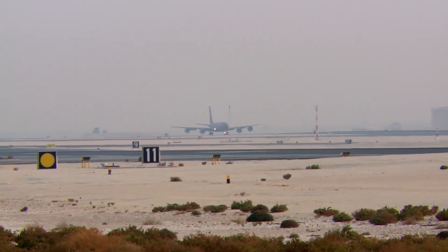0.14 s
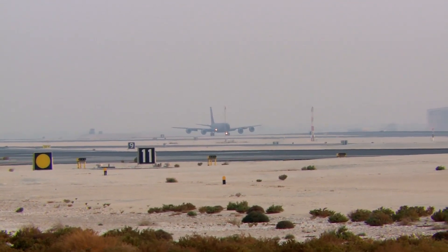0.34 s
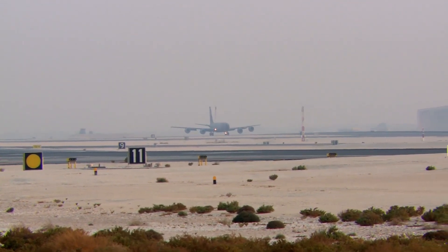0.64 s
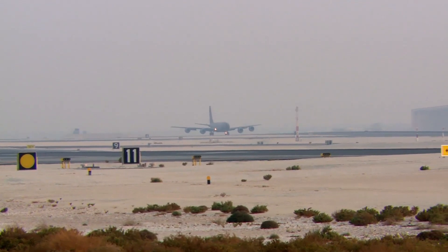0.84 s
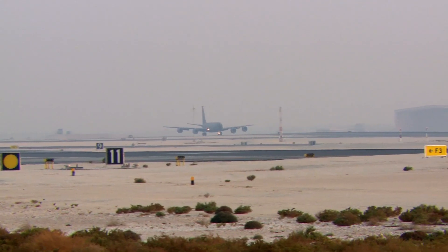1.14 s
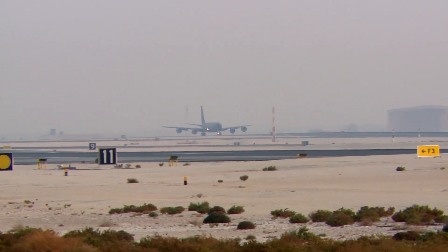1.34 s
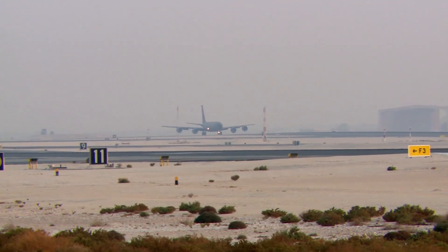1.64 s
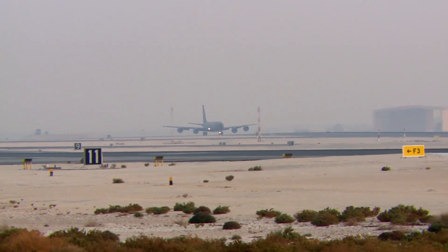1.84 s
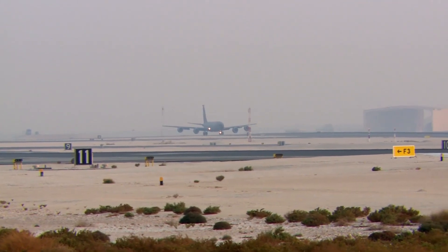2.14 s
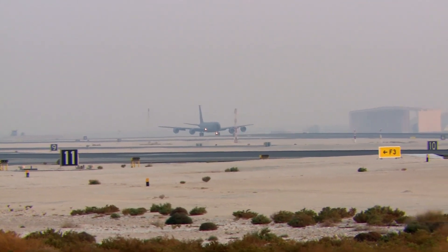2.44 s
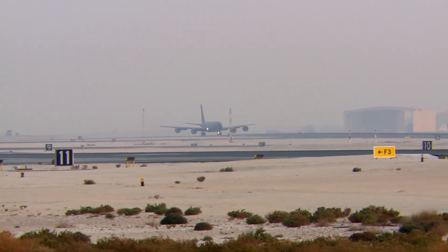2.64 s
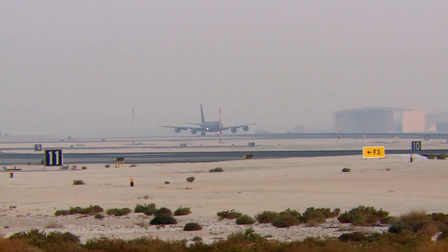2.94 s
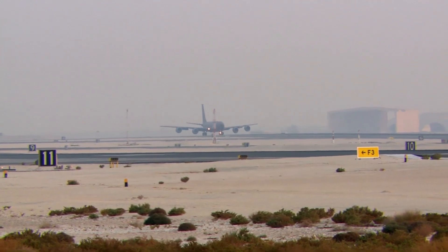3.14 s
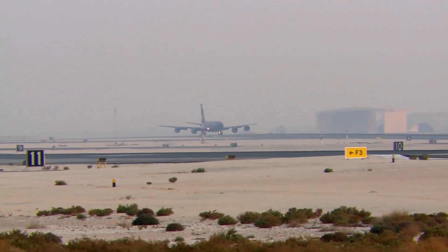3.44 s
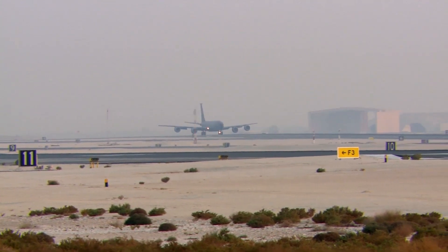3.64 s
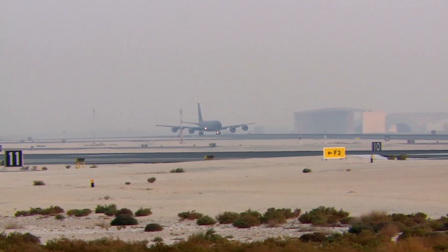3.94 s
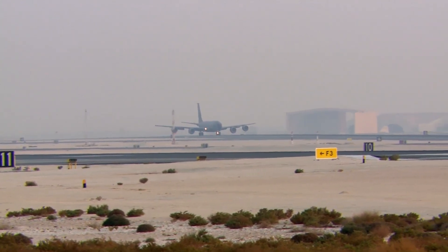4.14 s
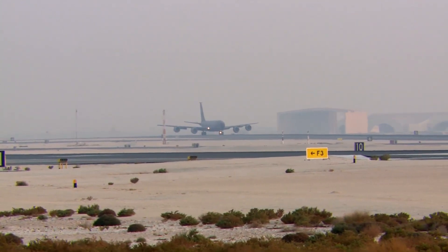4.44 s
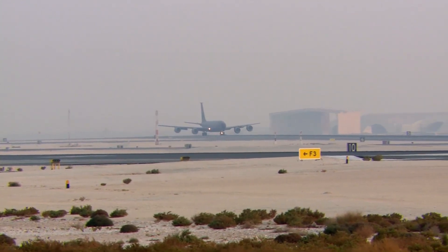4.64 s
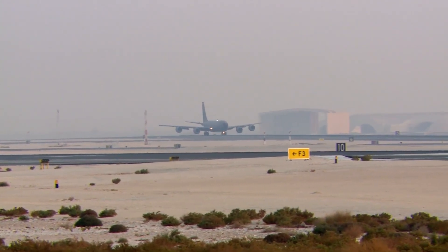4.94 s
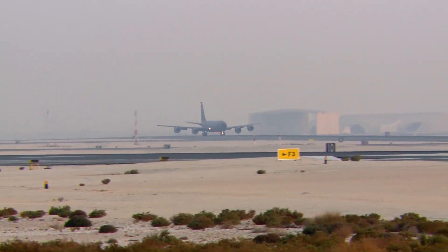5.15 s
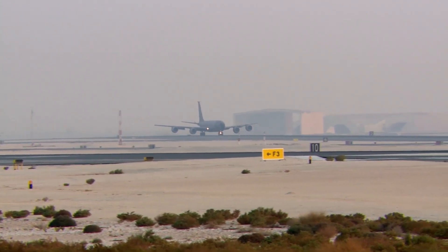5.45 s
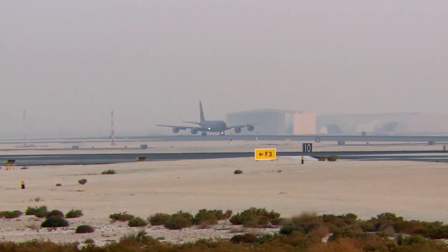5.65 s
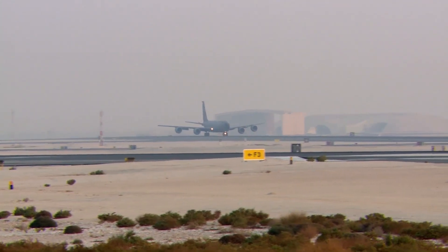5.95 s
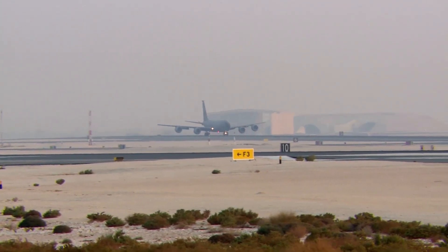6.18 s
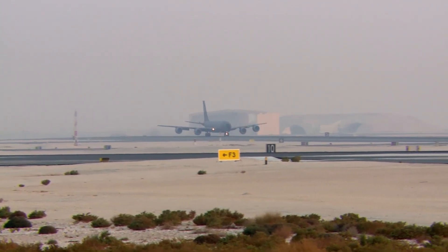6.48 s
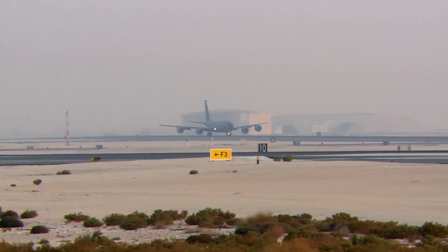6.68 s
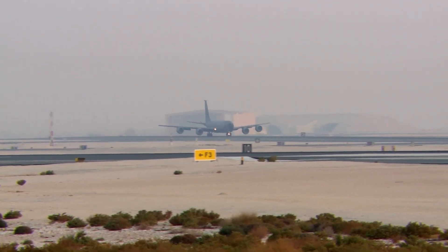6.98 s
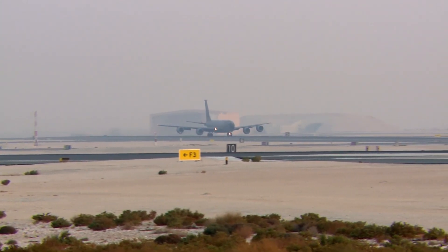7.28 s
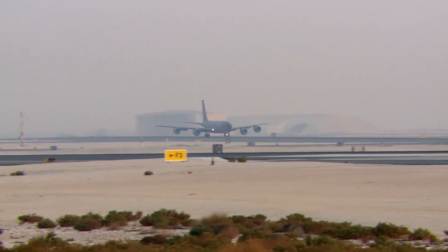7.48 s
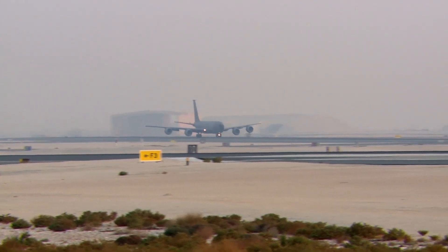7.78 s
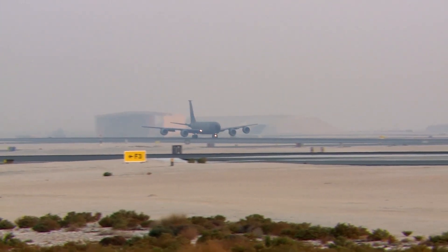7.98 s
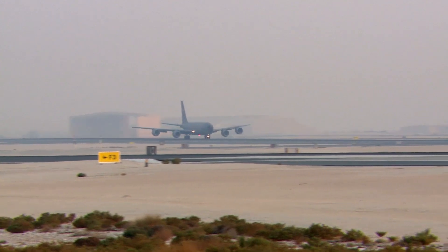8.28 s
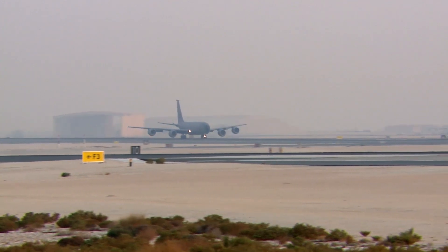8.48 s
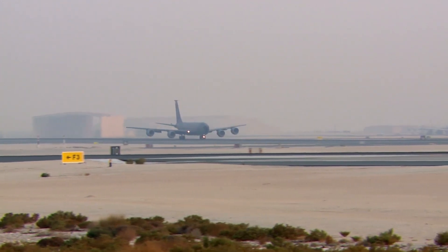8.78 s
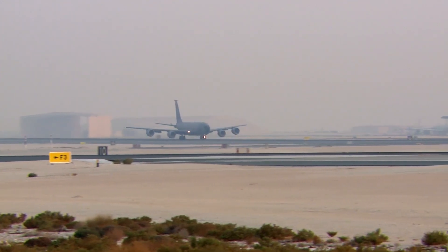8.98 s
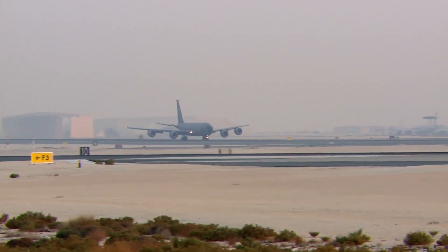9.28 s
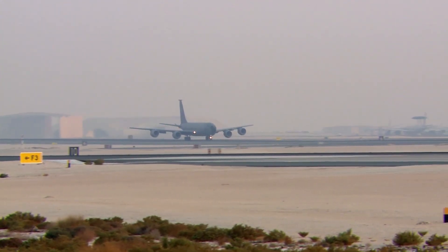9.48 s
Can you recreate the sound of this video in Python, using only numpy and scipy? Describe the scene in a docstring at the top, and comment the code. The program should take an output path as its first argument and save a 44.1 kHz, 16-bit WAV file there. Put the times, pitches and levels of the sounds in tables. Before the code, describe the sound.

From the start, a four-engined jet far across an open airfield makes a deep rumble and a dull roar, with a faint intake rush and an even microphone hiss underneath. The sound grows gradually as the aircraft rolls nearer. The handled camera gives tiny ticks at about 0.3 seconds, a sharper plastic click at 3.6 seconds, and two faint ticks around 7.5 seconds. From about 6 seconds the rush becomes stronger and brighter, and a thin fan whine comes through with a faint buzz, fluttering and slowly rising in pitch. The whine flares briefly near 6.3 and 7.3 seconds. Around 9 seconds the rush and whine are at their strongest, and the low exhaust roar swells just behind them, peaking at about 9.5 seconds.

```python
"""A four-engined jet rolls toward a camera from far across a hot, flat airfield.
From the start its exhaust rumbles and roars dully, over a faint intake rush and microphone hiss.
The handled camera clicks a few times, loudest at 3.6 s. The rush grows, and a thin whine from the
fan blades comes through, slowly rising in pitch and fluttering in the hot air. Near 9 s the sound
beamed from the intakes sweeps over the camera, followed by the swelling roar of the exhaust."""
import sys
import numpy as np
from scipy import signal
from scipy.fft import rfft, irfft, next_fast_len
from scipy.io import wavfile
from scipy.ndimage import uniform_filter1d, map_coordinates

SR = 44100
rng = np.random.default_rng(int(sys.argv[2]) if len(sys.argv) > 2 else 0)


def generate_wav(sig):
    """Save sig (samples, or channels by samples) to the path in sys.argv[1] as 16-bit PCM at SR."""
    pcm = np.round(np.clip(np.atleast_2d(sig).T, -1, 1) * 32767).astype(np.int16)
    wavfile.write(sys.argv[1], SR, pcm)


N = 424241


def amp(db):
    """Turn decibels into a gain to multiply by."""
    return 10 ** (np.asarray(db) / 20)


def unit(x):
    """Scale a signal to an average strength (rms) of 1."""
    return x / np.sqrt(np.mean(np.abs(x) ** 2) + 1e-20)


def approach(start_db, db_per_s):
    """Level in dB of a source that rolls steadily nearer."""
    return start_db + db_per_s * np.arange(N) / SR


def swell(peak_s, width_s, db):
    """A bell-shaped rise and fall in dB around peak_s."""
    return db * np.exp(-.5 * ((np.arange(N) / SR - peak_s) / width_s) ** 2)


def wobble(rate_hz):
    """A smooth curve through rate_hz random points a second."""
    coarse = np.arange(0, N + 64, 64)
    points = rng.standard_normal(int(N * rate_hz / SR) + 4)
    curve = map_coordinates(points, [coarse * rate_hz / SR], mode="nearest")
    return unit(np.interp(np.arange(N), coarse, curve))


def filtered(x, gain_at):
    """Multiply each frequency in x by gain_at(hz)."""
    size = next_fast_len(N + SR // 2)
    return irfft(rfft(x, size) * gain_at(np.fft.rfftfreq(size, 1 / SR)), size)[:N]


def noise(spectrum, patchy_db):
    """Noise shaped by a pitch and level table, with random louder and softer patches."""
    grid = signal.stft(rng.standard_normal(N), nperseg=1024)[2]  # pitch by time
    patches = uniform_filter1d(rng.standard_normal(grid.shape), size=14, axis=0)
    patches = uniform_filter1d(patches, size=14, axis=1)
    patchy = signal.istft(grid * amp(patchy_db * unit(patches)), nperseg=1024)[1][:N]
    pitch_hz, level_db = np.transpose(spectrum)
    return unit(filtered(patchy, lambda hz: amp(np.interp(np.log(hz + 1), np.log(pitch_hz), level_db))))


# How strong the rumble is from low to high. Columns: pitch_hz, level_db
RUMBLE_SPECTRUM = [(10, -20), (25, -11), (40, -8.5), (55, 0.5), (72, 0.5), (100, -1.5), (150, -7),
                   (205, -9), (250, -20), (400, -63), (1200, -120)]


def exhaust_rumble():
    """The jets of exhaust make a deep rumble that grows as the aircraft nears."""
    return amp(approach(-34.5, db_per_s=0.52)) * noise(RUMBLE_SPECTRUM, patchy_db=.5)


# The exhaust's roar from far away and from nearer by. Columns: pitch_hz, level_db
FAR_ROAR_SPECTRUM = [(20, -59), (100, -22.5), (220, -1), (300, 1), (450, -9.5), (620, -10), (700, -10),
                     (870, -10), (1050, -18), (1500, -24), (2000, -33.5), (2600, -51), (4500, -48),
                     (12000, -120)]
NEAR_ROAR_SPECTRUM = [(10, -65), (60, -13.5), (140, 2), (280, 1.5), (380, -1.5), (480, -4.5), (600, -11),
                      (720, -18), (1000, -39), (1500, -45), (8000, -120)]


def exhaust_roar(far_db=-46.5, near_boost_db=2.0, emerge_db=-41):
    """The near roar rises out of the dull, far one as the jets' beam of sound sweeps over the camera."""
    far = amp(far_db) * noise(FAR_ROAR_SPECTRUM, patchy_db=1)
    roar_db = approach(-47.5, db_per_s=0.26) + swell(peak_s=9.45, width_s=1.316, db=11)
    shadow_db = 0.64 * np.minimum(roar_db - emerge_db, 0)  # quieter still while below emerge_db
    near = amp(roar_db + shadow_db + near_boost_db) * noise(NEAR_ROAR_SPECTRUM, patchy_db=0)
    return far + near


# The intakes' broad rush and their brighter howl. Columns: pitch_hz, level_db
RUSH_SPECTRUM = [(50, -120), (600, -19), (1100, -2), (1450, -2.5), (1850, 2.5), (2200, -1.5), (2600, -5),
                 (3200, -10), (3800, -17), (4500, -31), (6000, -50.5), (12000, -120)]
HOWL_SPECTRUM = [(200, -120), (1200, -28), (1700, -14), (2200, 6), (2700, -1), (3200, -6), (3700, -11.5),
                 (4300, -15), (4600, -27), (6000, -40), (10000, -120)]
# Moments when hot air focuses the fans' sound. Columns: peak_s, width_s, whine_gain_db, howl_gain_db
HOT_AIR_FLARES = [(6.28, 0.14, 5, 4), (7.28, 0.032, 9, -3), (8.12, 0.1, 2, 3.5), (8.6, 0.067, 0, 5.5),
                  (8.97, 0.22, 8.5, 2.5)]


def intake_rush(rush_db, near_db=-55, brightening=0.66):
    """Broad fan noise; the air swallows less of its treble as the aircraft gets nearer."""
    rush = noise(RUSH_SPECTRUM, patchy_db=1.2)
    howl = noise(HOWL_SPECTRUM, patchy_db=2.4)
    flare_db = sum(swell(peak_s, width_s, db) for peak_s, width_s, _, db in HOT_AIR_FLARES)
    howl_db = -6 + brightening * (rush_db - near_db) + flare_db
    return amp(rush_db) * (amp(-0.3) * rush + amp(howl_db) * howl)


# The nearly flat spread of the hiss. Columns: pitch_hz, level_db
HISS_SPECTRUM = [(100, 3.5), (3000, -4), (5000, -4), (7000, -5), (15000, -6.5)]


def microphone_hiss(level_db=-70):
    """The microphone adds a faint, even hiss of its own."""
    return amp(level_db) * noise(HISS_SPECTRUM, patchy_db=0)


# Clicks of the handled camera; a fade is the time to drop by 60 dB.
# Columns: start_s, snap_db, ring_db, snap_fade_s, snap_pitch_hz
CAMERA_CLICKS = [(.2868, -61, -70, .025, 7700), (0.288, -65, -72, .03, 4100),
                 (.3805, -63, -78, 0.027, 4300), (3.5899, -44, -47, 0.019, 3720),
                 (3.5959, -39, -40, 0.014, 895), (3.5995, -38.5, -42, 0.023, 1400),
                 (3.6312, -49, -48, 0.011, 9800), (7.467, -57, -85, 0.013, 10850),
                 (7.57, -54, -69, .02, 4970)]
# The notes at which the camera's plastic body rings. Columns: pitch_hz, level_db, fade_s
BODY_NOTES = [(627, 6, 0.026), (1010, 1, .05), (1154, 7, 0.033), (1320, 5, 0.04), (1510, -3, 0.044),
              (2680, -1, 0.022), (3400, -11, .022), (4100, -10, .02), (4970, -12, 0.017),
              (8700, -14, 0.016), (10400, -13, .015)]


def camera_clicks(snap_width_octaves=0.13, attack_s=0.0006, dull_hz=12000):
    """Each click is a short snap of noise that rings the camera's body."""
    out = np.zeros(N + SR)
    t = np.arange(SR // 8) / SR
    hz = np.fft.rfftfreq(len(t), 1 / SR) + 1
    treble_cut = 1 / np.hypot(1, (hz / dull_hz) ** 10)
    onset = 1 - np.exp(-t / attack_s)
    for start_s, snap_db, ring_db, snap_fade_s, snap_pitch_hz in CAMERA_CLICKS:
        band = treble_cut / np.hypot(1, np.log2(hz / snap_pitch_hz) / snap_width_octaves)
        burst = irfft(rfft(rng.standard_normal(len(t))) * band, len(t))
        snap = unit(burst) * amp(-60 * t / snap_fade_s)
        ring = sum(amp(level_db + rng.normal(0, 2.4) - 60 * t / fade_s) * np.sin(2 * np.pi * pitch_hz * t)
                   for pitch_hz, level_db, fade_s in BODY_NOTES)
        out[round(start_s * SR):][:len(t)] += (amp(snap_db) * snap + amp(ring_db) * ring) * onset
    return out[:N]


def shaft_angle(start_hz=89.35, gain_hz_per_s=.645):
    """How far the fan shafts have turned, in radians, as they steadily speed up."""
    turns_per_s = start_hz + gain_hz_per_s * np.arange(N) / SR
    return 2 * np.pi * np.cumsum(turns_per_s) / SR


def fluttering_tone(phase, flutter_hz, direct):
    """A tone flutters because it arrives both directly and by paths scattered in the hot air."""
    paths = unit(direct + wobble(flutter_hz) + 1j * wobble(flutter_hz))
    return paths.real * np.cos(phase) + paths.imag * np.sin(phase)


# The tones in the fans' buzz. Columns: cycles_per_turn, level_db
BUZZ_TONES = [(3, 5), (10, -10), (13, -17), (14, -14), (16, -10), (19, -11), (20, -14), (21, -14),
              (22, -10), (23, -11), (24, -14), (30, -20), (34, -21), (39, -28), (40, -22)]


def blade_buzz(angle, rush_db, offset_db=-1.5):
    """Uneven blades buzz faintly at multiples of the shaft speed, growing with the intake rush."""
    buzz = sum(amp(level_db) * fluttering_tone(cycles_per_turn * angle, flutter_hz=14, direct=1.4)
               for cycles_per_turn, level_db in BUZZ_TONES)
    return amp(rush_db + offset_db) * buzz


# The four fans, one to an engine. Columns: speed_ratio (to the shared shaft speed), level_db
ENGINE_FANS = [(.9962, -9), (.9979, -8), (.9989, 0), (1.0013, -8)]


def blade_whine(angle, blades=44):
    """Each fan whines at the rate its blades pass; slightly unequal speeds make the tones beat."""
    whine = sum(amp(level_db) * fluttering_tone(blades * speed_ratio * angle, flutter_hz=40, direct=1.7)
                for speed_ratio, level_db in ENGINE_FANS)
    flare_db = sum(swell(peak_s, width_s, db) for peak_s, width_s, db, _ in HOT_AIR_FLARES)
    return amp(approach(-90, db_per_s=1.93) + flare_db) * unit(whine)


def scene():
    """The nearing aircraft plus the camera's own small noises, in one channel."""
    intake_beam_db = swell(peak_s=8.85, width_s=0.94, db=5.5)  # the intakes point at the camera
    shimmer_db = -0.33 * wobble(rate_hz=4)  # wavering in the hot air
    rush_db = approach(-69.5, db_per_s=1.0836) + intake_beam_db + shimmer_db
    angle = shaft_angle()
    jet = exhaust_rumble() + exhaust_roar() + intake_rush(rush_db)
    fans = blade_whine(angle) + blade_buzz(angle, rush_db)
    return (jet + fans + microphone_hiss() + camera_clicks())[None]


def record(dry, top_hz=15050):
    """The camera keeps nothing higher than top_hz."""
    return filtered(dry[0], lambda hz: hz < top_hz)[None]


dry = scene()
out = record(dry)
generate_wav(out)
```